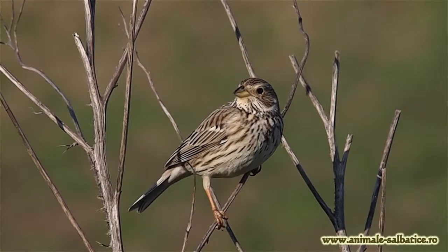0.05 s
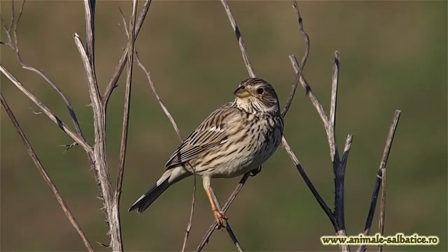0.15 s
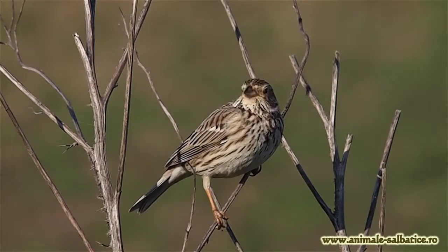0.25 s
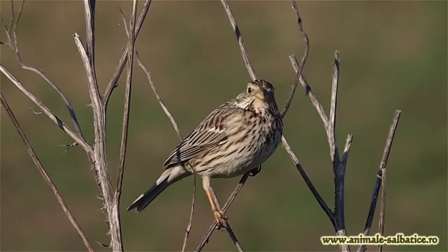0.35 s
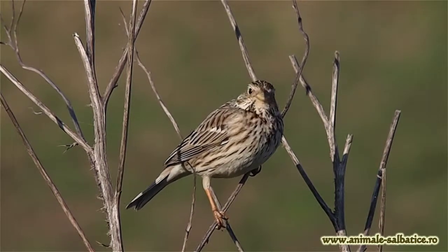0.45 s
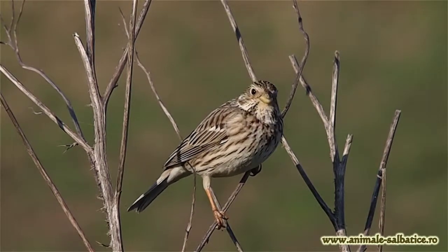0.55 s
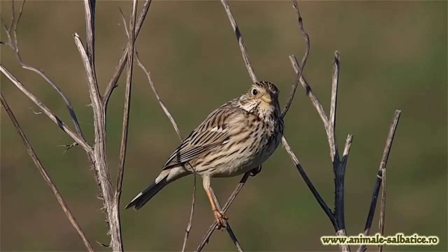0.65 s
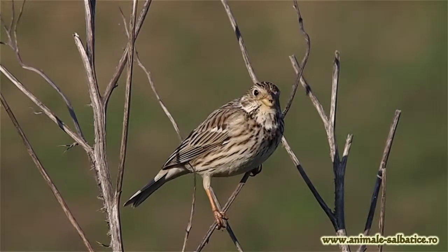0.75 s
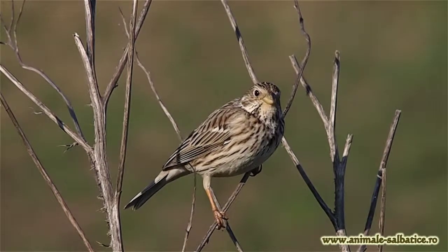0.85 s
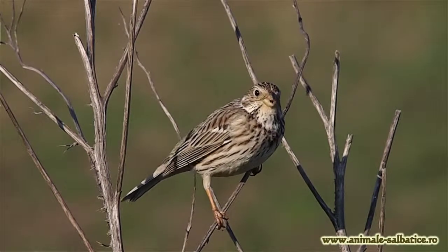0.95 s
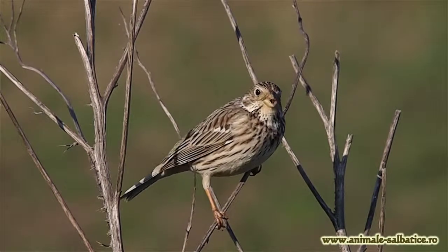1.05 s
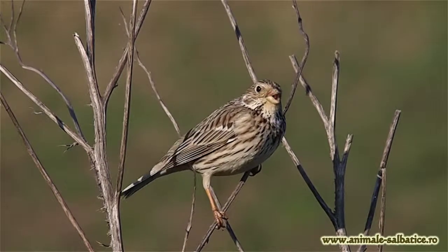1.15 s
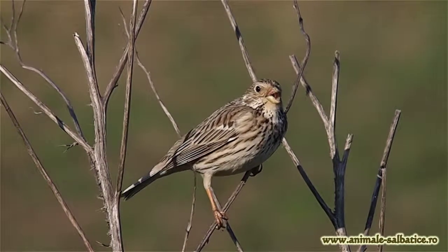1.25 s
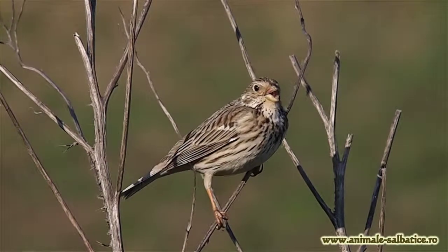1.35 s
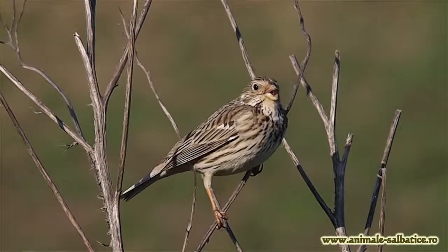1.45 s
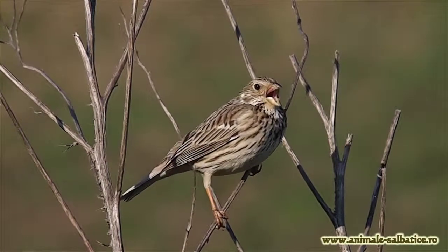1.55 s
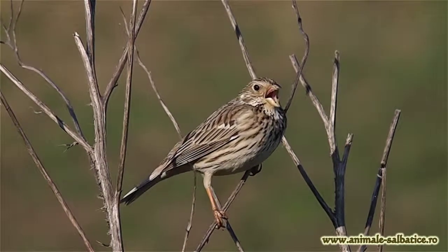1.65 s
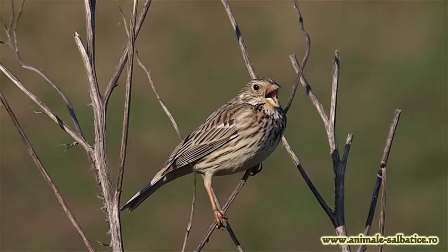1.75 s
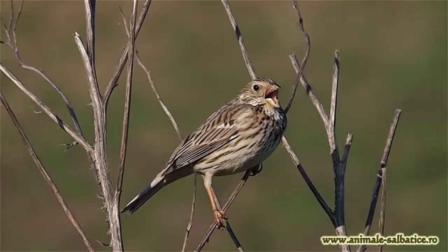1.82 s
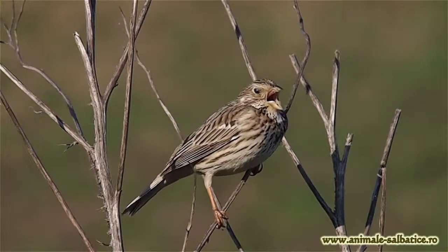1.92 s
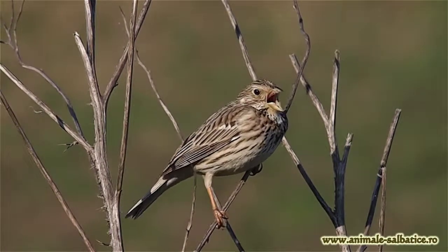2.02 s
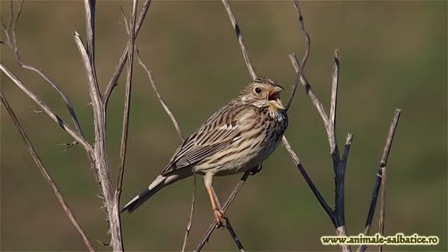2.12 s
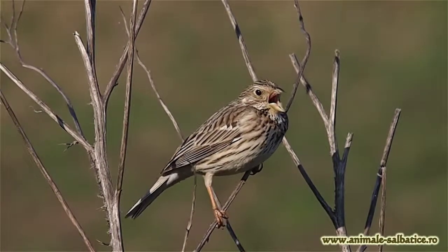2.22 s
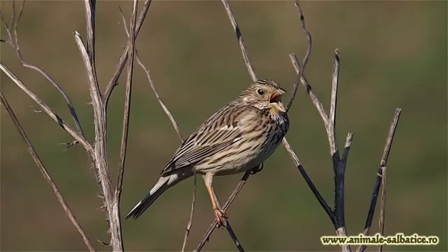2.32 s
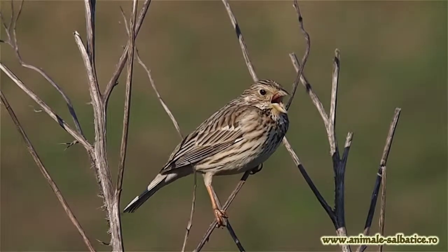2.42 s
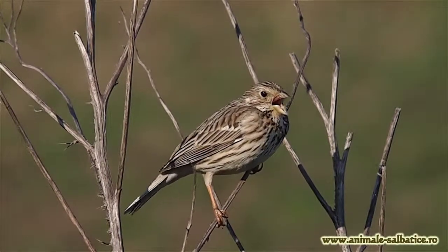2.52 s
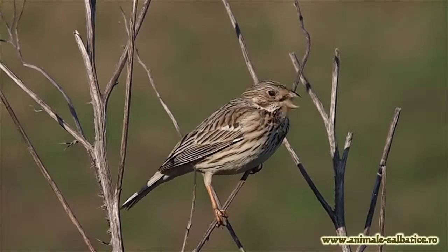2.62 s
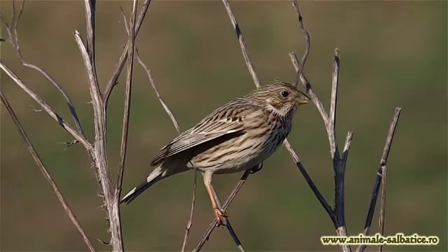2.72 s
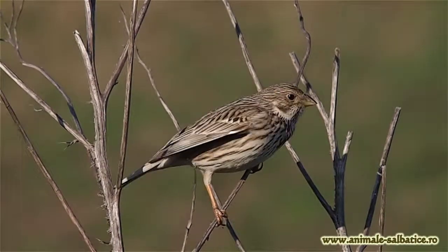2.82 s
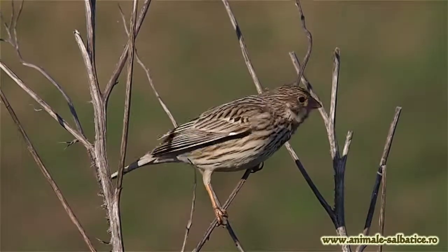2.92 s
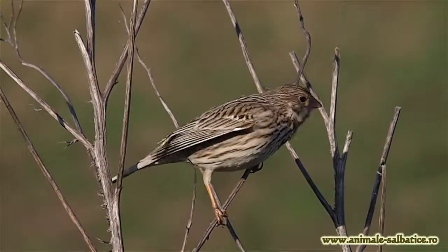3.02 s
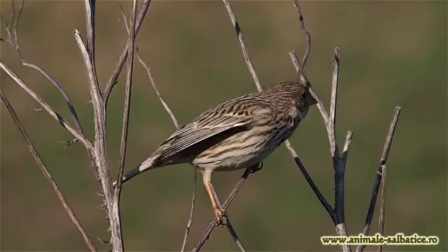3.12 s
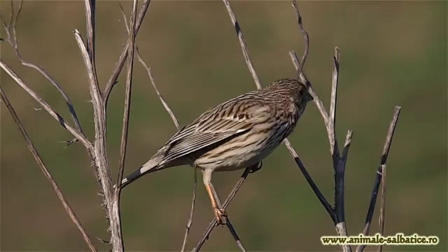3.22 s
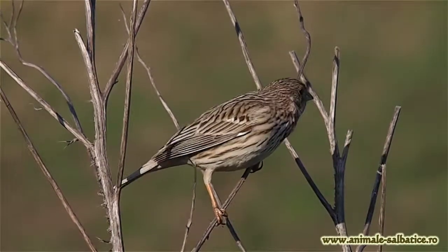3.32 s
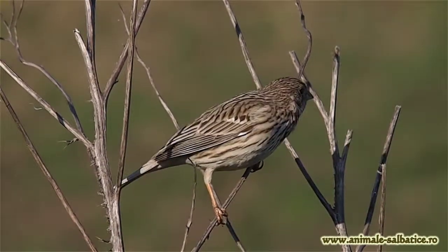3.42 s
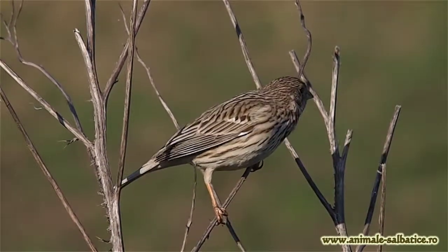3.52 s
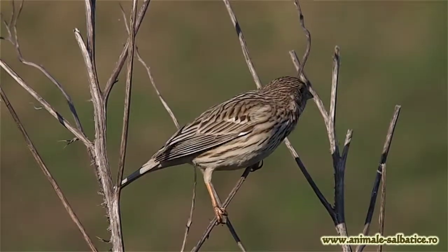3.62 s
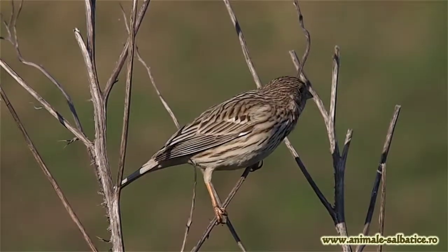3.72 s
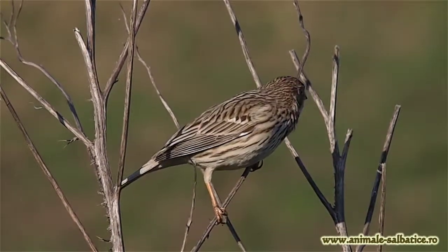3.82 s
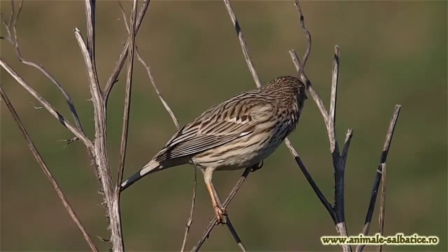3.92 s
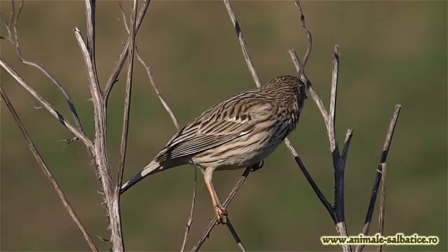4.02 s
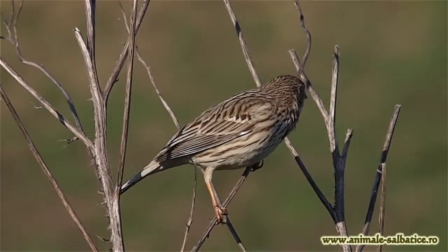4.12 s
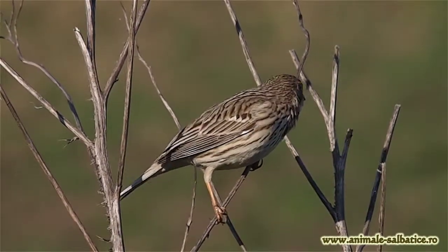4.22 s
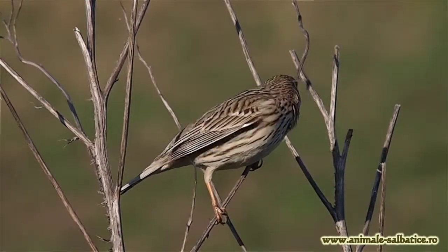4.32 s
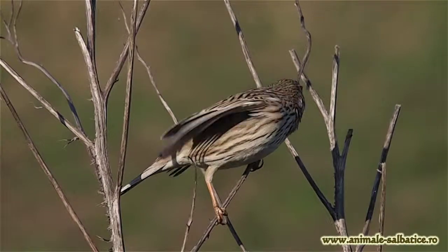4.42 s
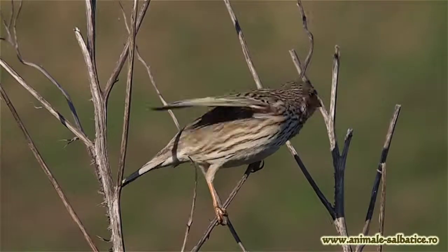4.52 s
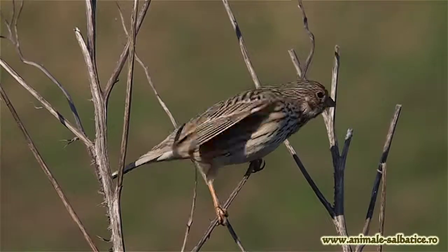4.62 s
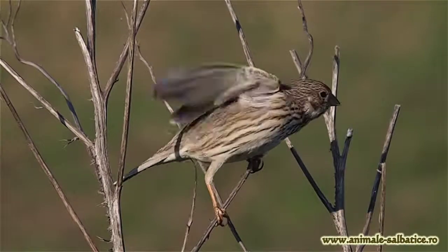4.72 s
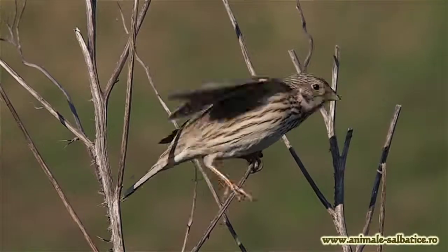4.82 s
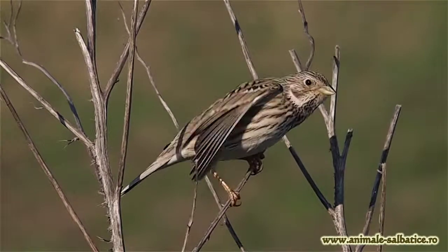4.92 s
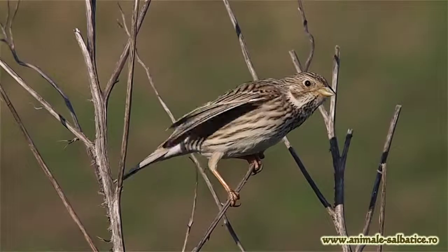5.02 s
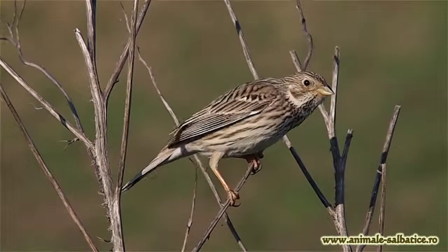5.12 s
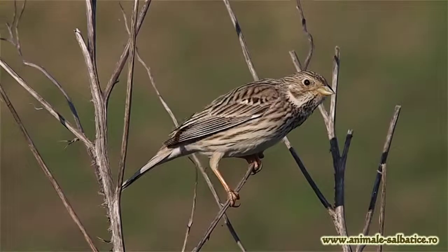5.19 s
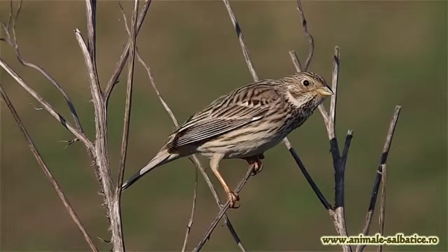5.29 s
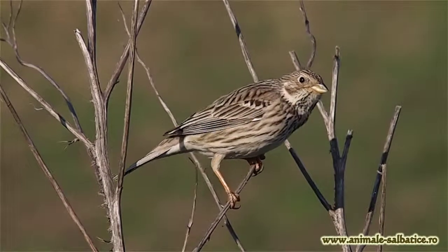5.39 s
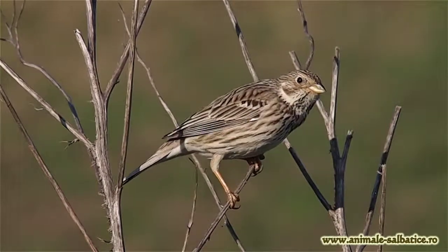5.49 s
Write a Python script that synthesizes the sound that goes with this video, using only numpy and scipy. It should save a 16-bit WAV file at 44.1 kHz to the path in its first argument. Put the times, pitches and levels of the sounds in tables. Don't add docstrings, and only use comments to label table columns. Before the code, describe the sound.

Open field, dry and close, with little echo. Soft steady hush first, then a bunting's clicks speed up from faint to loud, run into a very fast rattle, snapping notes, a slower short trill and squeaky slides, fading within about two seconds. The hush dips slightly under the song and returns; far birds chirp and rasp barely audibly later.

```python
import sys
import numpy as np
from scipy import signal
from scipy.fft import rfft, irfft, next_fast_len
from scipy.io import wavfile
from scipy.ndimage import uniform_filter1d, map_coordinates

SR = 44100
rng = np.random.default_rng(int(sys.argv[2]) if len(sys.argv) > 2 else 0)


def int16_out(signal):
    q = np.round(np.clip(np.atleast_2d(signal).T, -1, 1) * 32767)
    wavfile.write(sys.argv[1], SR, q.astype(np.int16))


def makeup_ratio(level_db):
    decades = np.asarray(level_db, float) / 20
    return 10 ** decades


N = 244755

# (time [s], peak level [dB], stretch [ratio], floor length [ms], floor level [dB])
RISES = [(1.8293, -8.5, 0.7, 12, -17.5), (1.9587, -12.5, 0.68, 8, -18), (2.301, -11, .75, 8, -19.5),
         (2.326, -11, 0.83, 6, -19), (2.3525, -11, 1.1, 6, -22), (2.4815, -13.5, 1.1, 11, -18),
         (2.5222, -10.5, 1.1, 13, -19.5)]
# (time [s], peak level [dB], stretch [ratio], floor length [ms], floor level [dB])
STUBS = [
    (2.188, -12, .7, 11, -17.5),
    (2.2154, -12.5, .9, 7, -16),
    (2.7976, -26.5, 0.79, 9, -34),
]
# (first time [s], period [ms], gap [ms], first level [dB], last level [dB])
PAIRS = (1.7630, 8, 2.4, -28, -9.5)


def bunting():
    upper = upper_voice()
    low = lower_voice()
    shake = unit(filtered(rng.standard_normal(N), lambda hz: 1 / (1 + (hz / 2200) ** 6)))
    rough = shake * (makeup_ratio(-37) * upper + makeup_ratio(-5.5) * low)
    rasp = filtered(rough, lambda hz: 1 / (1 + (4400 / (hz + 1)) ** 16))
    spray = makeup_ratio(-29) * upper * rng.standard_normal(N)
    spray = filtered(spray, lambda hz: 0.33 + 0.6 * (hz > 8500))
    return opening() + upper + low + rasp + spray


def opening():
    # (tick time [s], tick level [dB], whistle time [s], whistle length [ms], whistle level [dB])
    phrases = [
        (.5602, -32.5, .579, 17.7, -36),
        (0.7739, -26, .79, 20.2, -26),
        (.9522, -19.5, .9655, 23.5, -23),
        (1.1145, -14.5, 1.1265, 24.9, -22.5),
        (1.2477, -10.5, 1.259, 27.4, -21.5),
        (1.3661, -7, 1.377, 29.2, -22.5),
        (1.4729, -7, 1.483, 29.3, -22),
    ]
    # (time [s], level [dB])
    last_tick = (1.5657, -6.5)
    # start, middle and end pitch at 20 ms; longer whistles are higher
    whistle_hz, hz_per_ms = np.array([3730, 3930, 4160]), np.array([18, 60, 46])
    whistles = [(s, ms, *(whistle_hz + hz_per_ms * (ms - 20)), db) for _, _, s, ms, db in phrases]
    out = glides(whistles, swell, second_db=-22, third_db=-28.5, flutter_db=1.1)
    gap_s = 0.0029
    for s, db, *_ in phrases + [last_tick]:
        hz = 6600 + 34.5 * db
        span = .045 + .0032 * (db + 35)
        pair = [snap(s, db - 7.5, hz, ms=1.3, span=span),
                snap(s + gap_s, db - 4, hz, ms=2.1, span=span)]
        out += glides(pair, bell, second_db=-30, third_db=-60)
    return out


def upper_voice():
    # (first time [s], first level [dB], last level [dB])
    snap_bursts = [(2.1674, -30, -13), (2.2001, -14, -8.5), (2.2849, -24.5, -12.5), (2.3152, -14, -8),
                   (2.342, -11.5, -7.5)]
    snap_counts = (4, 3, 4, 2, 2)
    times = paired(*PAIRS, count=6) + bursts(snap_bursts, snap_counts, 4)
    snaps = [snap(s - .0002, db - 4.5, 6630, ms=2.5, span=.17) for s, db in times]
    out = glides(snaps, bell, second_db=-29.5, third_db=-62.5)
    out += glides(swept(), bell, second_db=-34, third_db=-50, flutter_db=.8)
    out += glides(swelling(), grow, second_db=-32, third_db=-51, flutter_db=2.5)
    return out + glides(trills(), plateau, second_db=-30, third_db=-54, flutter_db=2)


def trills():
    # (time [s], length [ms], start [Hz], middle [Hz], end [Hz], peak level [dB])
    fast = [
        (-.0008, 6.16, 6860, 6690, 6160, -12),
        (.002, 3.7, 5920, 5820, 5070, -21.5),
        (.002, 4, 8100, 7900, 7600, -32),
        (.004, 6, 4900, 4820, 4640, -34.5),
    ]
    # (time [s], length [ms], start [Hz], middle [Hz], end [Hz], peak level [dB])
    slow = [
        (-.001, 7.2, 7820, 7620, 7330, -10),
        (.0054, 5.6, 7100, 6800, 6300, -11.5),
        (.0092, 4, 5480, 5620, 5750, -22),
        (.008, 3.5, 7900, 7750, 7500, -28),
        (.002, 6, 4350, 4750, 5250, -37),
    ]
    fast_run = run(1.6191, period_ms=10.12, slowing_ms=.027, db=-7.5, fade_db=.07, count=11)
    slow_run = run(1.9961, period_ms=17.55, slowing_ms=.003, db=-9.5, fade_db=.07, count=7)
    return trill(fast, fast_run) + trill(slow, slow_run)


def swept():
    # (time [s], length [ms], start [Hz], middle [Hz], end [Hz], level under the peak [dB])
    fall = [
        (-.004, 3.42, 8870, 8670, 8300, -21),
        (0, 5.6, 8290, 7720, 7290, 0.5),
        (.0045, 4.6, 7500, 6950, 6100, 0),
    ]
    rise = [
        (0, 5.5, 6020, 6690, 7320, -0.5),
        (.0048, 2.6, 7380, 7420, 7710, -2.5),
    ]
    cross = [
        (0, 5.5, 7750, 7480, 7150, -1.5),
        (.0052, 4, 6900, 6680, 6750, 0),
        (.0088, 2.8, 6900, 7300, 7800, -3.5),
        (.002, 5.5, 5330, 5750, 5950, -12),
    ]
    dip = [
        (0, 9, 8300, 7580, 8200, 0),
        (-.003, 3.5, 8750, 8510, 8260, -19),
    ]
    climb = [(-.003, 5, 5100, 5500, 6000, -20.5), (.0016, 4.5, 6200, 6600, 6900, -5),
             (.0022, 2.6, 5190, 5600, 5750, -10.5), (.002, 4.7, 7380, 7460, 7900, -10),
             (.006, 3, 6170, 6450, 6600, -11), (.0075, 4, 6840, 7300, 7800, -1),
             (.0125, 2, 8000, 8100, 8360, -13), (.0235, 8.7, 4990, 5600, 5870, -16)]
    # (time [s], peak level [dB], stretch [ratio], tail length [ms], tail level [dB])
    falls = [
        (2.156, -12, 1, 2, -27),
        (2.2385, -10.5, 1.07, 4, -22),
        (2.269, -10.5, 0.89, 4.5, -22.5),
        (2.3817, -11, .95, 10, -21),
        (2.422, -10.5, 1.1, 8, -22),
    ]
    # (time [s], peak level [dB], stretch [ratio])
    crosses = [
        (1.7434, -8.5, 1.05),
        (1.8800, -8, 1),
    ]
    dips = [
        (2.5652, -11, 1),
        (2.6187, -12, 0.9),
        (2.6719, -18, 1),
    ]
    climbs = [
        (1.5844, -6, 0.97),
    ]
    # (time [s], length [ms], start [Hz], end [Hz], peak level [dB])
    singles = [(1.9055, 4, 7650, 7320, -15.5), (1.9105, 5, 7500, 6900, -15.5),
               (1.9212, 4.7, 7800, 7200, -18), (1.9344, 4.5, 7800, 6600, -12.5),
               (1.977, 5.5, 7800, 6900, -14.5), (2.784, 4.3, 6880, 5800, -31.5),
               (2.5035, 7, 8250, 7400, -14.5), (2.51, 3.5, 7100, 5840, -16), (2.848, 5.2, 8100, 7370, -34),
               (2.855, 4.2, 7240, 8000, -33.5), (2.738, 9.1, 4850, 5050, -42.5),
               (2.746, 6.4, 5320, 6900, -33), (1.891, 15, 4300, 4650, -42), (1.936, 8, 4600, 4800, -33),
               (1.85, 7, 4750, 4650, -34), (1.949, 5, 4700, 4800, -33), (1.979, 9, 4650, 4850, -25),
               (2.633, 16, 4550, 4720, -54.5)]
    tail_s, tail_hz = .009, (5850, 5980, 6050)
    tails = [(s + stretch * tail_s, ms, *tail_hz, db) for s, _, stretch, ms, db in falls]
    notes = sing(fall[1:], falls[:1]) + sing(fall, falls[1:]) + tails
    notes += sing(rise, RISES) + sing(rise[:1], STUBS)
    notes += sing(cross, crosses) + sing(dip, dips) + sing(climb, climbs)
    return notes + straight(singles)


def swelling():
    # (time [s], length [ms], start [Hz], end [Hz], peak level [dB])
    held = [(1.823, 6.5, 6250, 6550, -14), (1.952, 7, 6500, 6740, -23.5), (2.179, 10, 6600, 6650, -19.5),
            (2.21, 6, 6750, 6600, -18), (2.294, 7.5, 6500, 6650, -19)]
    overlap_ms = 1
    floors = [(s - ms / 1000, ms + overlap_ms, 5350, 5500, 5900, db)
              for s, _, _, ms, db in RISES + STUBS]
    return floors + straight(held)


def lower_voice():
    # (first time [s], first level [dB], last level [dB])
    murmur = [
        (1.9064, -30.5, -29),
        (1.8745, -28, -36),
    ]
    pip_counts = (6, 2)
    # (time [s], length [ms], start [Hz], end [Hz], peak level [dB])
    slurs = [(1.838, 10, 5470, 5330, -26), (1.852, 10, 5550, 5400, -25), (1.865, 7.3, 5300, 5550, -23.5),
             (1.927, 6, 5350, 5450, -23), (1.939, 8.5, 5760, 5180, -25), (1.966, 10, 5110, 5400, -25),
             (1.981, 13, 5600, 5180, -21.5)]
    delay_ms, period_ms = 4.8, 8.6
    under = bursts([(PAIRS[0] + delay_ms / 1000, -29.5, -18.5)], [6], period_ms)
    pulses = [snap(s, db - 1, 5250, ms=2.9, span=.0425) for s, db in under]
    pips = [snap(s - .0022, db - 1.5, 5400 + 130 * rng.standard_normal(), ms=3.7, span=.05)
            for s, db in bursts(murmur, pip_counts, 4.2)]
    out = glides(pulses, bell, second_db=-16.5, third_db=-60)
    out += glides(pips, bell, second_db=-21.5, third_db=-61)
    return out + glides(straight(slurs), bell, second_db=-25, third_db=-60, flutter_db=4)


def glides(notes, shape, second_db, third_db, flutter_db=0.):
    out = np.zeros(N)
    for s, ms, a, b, c, db in notes:
        first = round((s - ms / 2500) * SR)
        count = round(1.6 * ms * SR / 1000)
        u = (np.arange(first, first + count) / SR - s) * 1000 / ms
        v = np.clip(u, -.2, 1.2)
        hz = a + (4 * b - 3 * a - c) * v + 2 * (a + c - 2 * b) * v * v
        phase = 2 * np.pi * (np.cumsum(hz) / SR + rng.random())
        knots = rng.standard_normal(12)
        flutter = flutter_db * map_coordinates(knots, [1 + u.clip(0, 1) * min(ms / 2, 9)])
        tone = np.sin(phase) + makeup_ratio(second_db) * np.sin(2 * phase)
        tone += makeup_ratio(third_db) * np.sin(3 * phase) * (hz < 5500)
        out[first:first + count] += (makeup_ratio(db + shape(u) + flutter) * tone)[:N - first]
    return out


def bell(u):
    return -12 * np.abs(2 * u - 1) ** 3.35


def plateau(u):
    return -12 * np.abs(2 * u - 1) ** 6


def grow(u):
    return -11 * (1 - u) + plateau(u)


def swell(u):
    stop = 14 * (u.clip(0) / .98) ** 24
    ramp = 18 * np.log10((u / 0.29).clip(.001, 1) + 0.082)
    return ramp - stop - 300 * (-u).clip(0)


def snap(s, db, hz, ms, span):
    return (s, ms, (1 + span) * hz, hz, (1 - span) * hz, db)


def straight(notes):
    return [(s, ms, a, (a + c) / 2, c, db) for s, ms, a, c, db in notes]


def run(first, period_ms, slowing_ms, db, fade_db, count):
    k = np.arange(count)
    onsets = first + k * (period_ms + slowing_ms * k) / 1000
    return np.c_[onsets, db - fade_db * (k - count / 2) ** 2]


def trill(syllable, onsets):
    drift = 1 + 0.0024 * rng.standard_normal(len(onsets))
    return [(at + s, ms, a * k, b * k, c * k, db + top + 8)
            for (at, top), k in zip(onsets, drift) for s, ms, a, b, c, db in syllable]


def sing(syllable, rows):
    return [(at + s * k, ms * k, a, b, c, db + top)
            for at, top, k, *_ in rows for s, ms, a, b, c, db in syllable]


def bursts(rows, counts, ms):
    return [(s + k * ms / 1000, a + (b - a) * k / (n - 1))
            for (s, a, b), n in zip(rows, counts) for k in range(n)]


def paired(first, period_ms, gap_ms, first_db, last_db, count):
    return [(first + (k * period_ms + j * gap_ms) / 1000,
             first_db + (last_db - first_db) * (k / (count - 1)) ** .35)
            for k in range(count) for j in range(2)]


def unit(x):
    return x / np.sqrt(np.mean(x ** 2) + 1e-20)


def filtered(x, response):
    m = next_fast_len(N + SR // 2)
    return irfft(rfft(x, m) * response(np.fft.rfftfreq(m, 1 / SR)), m)[:N]


def surroundings(x):
    # (delay [ms], level [dB])
    stems = [
        (10.5, -29.5),
        (4.033, -19.5),
        (21.6, -37),
    ]
    t = np.arange(SR // 6) / SR
    near = makeup_ratio(-60 * t / 0.11) / (1 + (t / 0.0124) ** 12)
    field = makeup_ratio(-14.5 - 60 * t / 0.14)
    tail = rng.standard_normal(len(t)) * (near + field) * (t > .002)
    scatter = makeup_ratio(-19) * signal.fftconvolve(x, tail / np.linalg.norm(tail))[:N]

    def paths(hz):
        def lag(ms):
            return np.exp(-2j * np.pi * hz * ms / 1000)
        bounce = 1 + 0.46 * lag(0.8983)
        echoes = 1 + sum(makeup_ratio(db) * lag(ms) for ms, db in stems)
        notch = 1 - 0.86 / (1 + 1j * (hz - 4680) / 110)
        return bounce * echoes * notch
    return filtered(x + scatter, paths)


def preamp(song):
    song = song / (1 + np.abs(song / .5) ** 4) ** .25
    ripple = song * np.sin(2 * np.pi * 3900 * np.arange(N) / SR)
    ghosts = filtered(ripple, lambda hz: makeup_ratio(-22) / (1 + (10000 / (hz + 1)) ** 24)
                      + makeup_ratio(-28.5) * (hz < 4300))
    return filtered(song + ghosts, lambda hz: 1 / (1 + (hz / 15250) ** 50))


def far_birds():
    # (time [s], length [ms], start [Hz], end [Hz], peak level [dB])
    chirps = [(.066, 11, 7430, 7120, -51), (.066, 8, 5770, 5080, -54), (.115, 10, 4820, 4230, -58),
              (.67, 43, 3080, 4200, -60), (4.14, 20, 3520, 4320, -54), (4.37, 12, 5100, 4150, -60),
              (4.415, 20, 5600, 6900, -58), (4.48, 10, 6980, 7480, -55.5), (4.53, 9.3, 8220, 7520, -52),
              (4.6, 11, 8070, 6960, -47), (4.695, 20, 2920, 1930, -55), (4.778, 39, 2980, 1490, -55),
              (4.943, 20, 3490, 4460, -55), (.908, 20, 4350, 3600, -60), (4.222, 14, 2800, 2800, -57),
              (4.312, 15, 2780, 2800, -55)]
    return glides(straight(chirps), bell, second_db=-30, third_db=-50, flutter_db=2)


def croaks():
    # (time [s], length [ms], rms level [dB])
    calls = [(.19, 40, -62), (4.145, 20, -61), (4.218, 26, -56), (4.308, 38, -55.5), (5.02, 30, -61),
             (5.38, 35, -58), (5.42, 55, -56), (5.515, 34, -56)]
    # (centre [Hz], width [Hz], level [dB])
    throat = [
        (1650, 600, -2),
        (2200, 300, -6),
        (2820, 130, 5),
    ]
    t = np.arange(N) / SR
    gate = sum(makeup_ratio(db + bell((t - s) * 1000 / ms).clip(-90, 0)) for s, ms, db in calls)
    air = rng.standard_normal(N) * (1 + 0.88 * np.sin(2 * np.pi * 110 * t))

    def resonance(f):
        return sum(makeup_ratio(db) * 1j * f * w / (c * c - f * f + 1j * f * w) for c, w, db in throat)
    return gate * unit(filtered(air, resonance))


def hush():
    # (frequency [Hz], noise level [dB per Hz])
    colours = [(20, -12.5), (39, -4.5), (110, -1.5), (350, -7), (700, -12), (1300, -14.5), (2800, -19),
               (4000, -23), (5200, -30), (6300, -24.5), (8000, -20), (10500, -17.5), (14300, -16),
               (15300, -21)]
    f, db = np.transpose(colours)
    z = signal.stft(rng.standard_normal(N), nperseg=512)[2]
    patches = uniform_filter1d(rng.standard_normal(z.shape), 8, 0)
    patches = uniform_filter1d(patches, 16, 1)
    noise = signal.istft(z * makeup_ratio(0.38 * unit(patches)), nperseg=512)[1][:N]
    coloured = filtered(noise, lambda hz: makeup_ratio(np.interp(np.log(hz + 1), np.log(f), db)))
    return makeup_ratio(-49.5) * unit(coloured)


def ducking(song):
    keep = np.exp(-1 / (.07 * SR))
    loud = signal.lfilter([1 - keep], [1, -keep], song ** 2)
    return (1 + (loud / makeup_ratio(-25.5) ** 2) ** 2) ** -.14


def scene():
    song = preamp(surroundings(bunting()))
    background = (far_birds() + croaks() + hush()) * ducking(song)
    return (song + filtered(background, lambda hz: hz < 15250))[None]


def low_pass(x):
    return signal.sosfilt(signal.butter(12, 16460, fs=SR, output="sos"), x)


def record(dry):
    mix = filtered(dry[0], lambda hz: hz < 16400)[None]
    return low_pass(mix)


dry = scene()
out = record(dry)
int16_out(out)
```